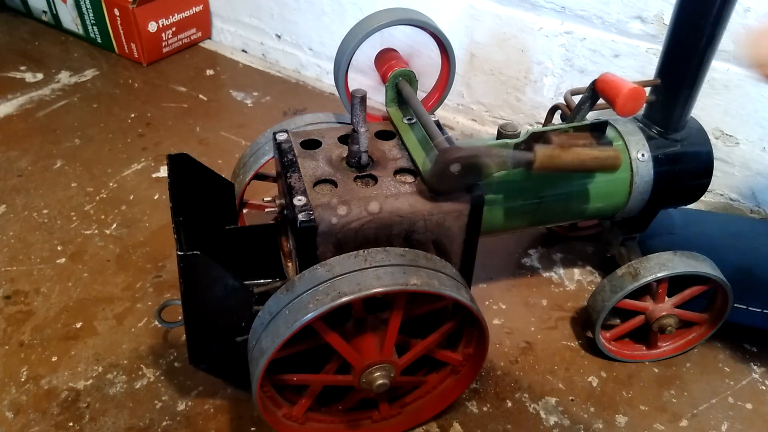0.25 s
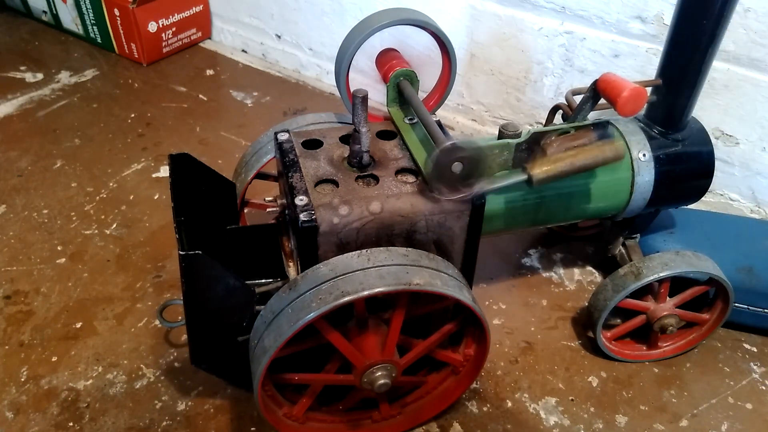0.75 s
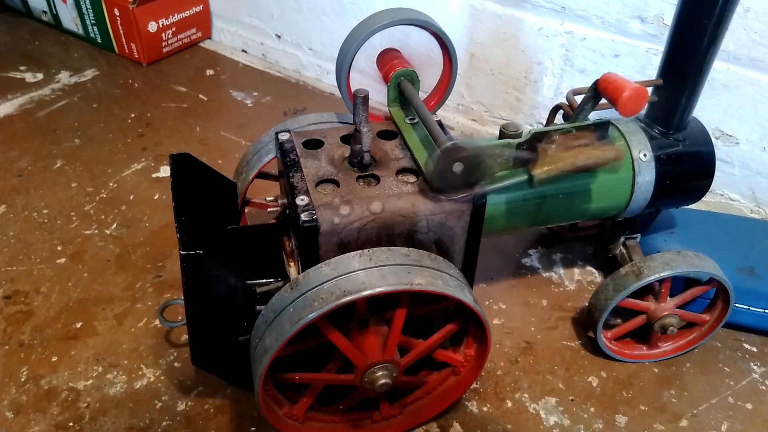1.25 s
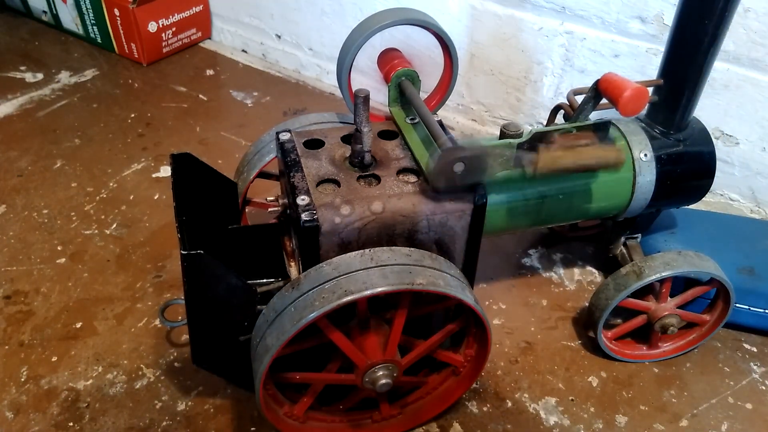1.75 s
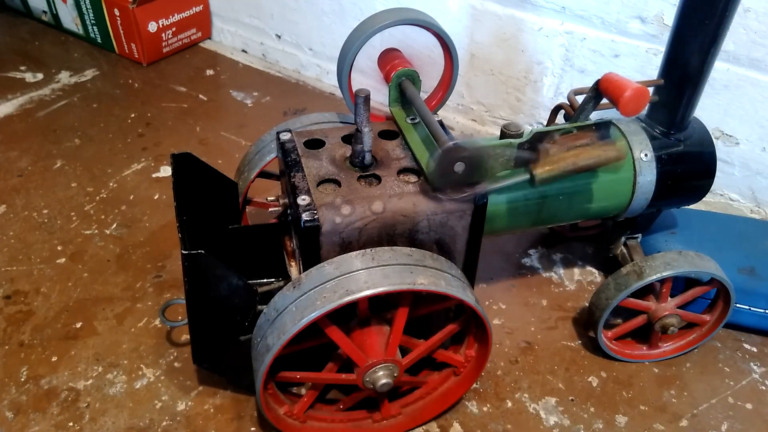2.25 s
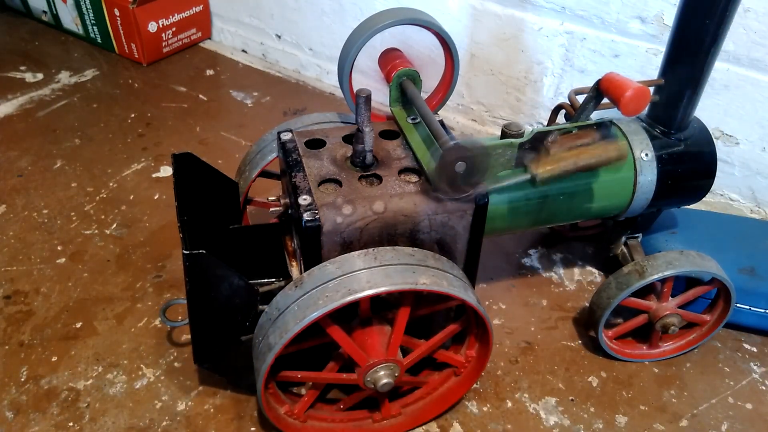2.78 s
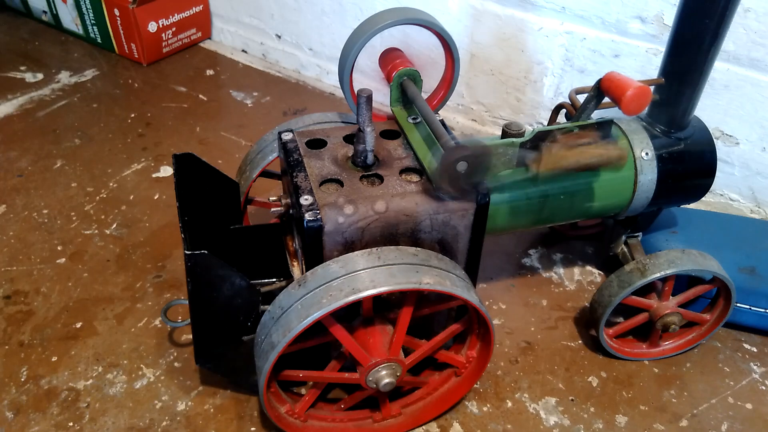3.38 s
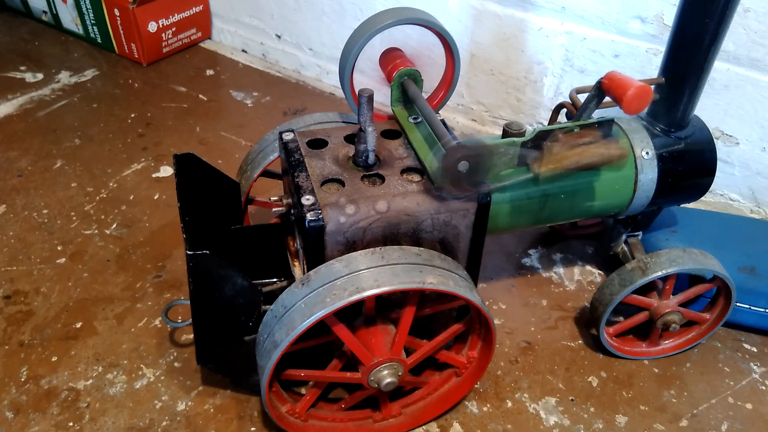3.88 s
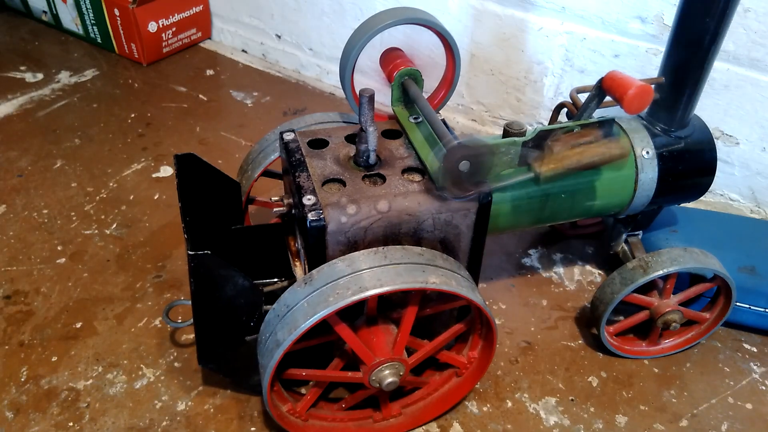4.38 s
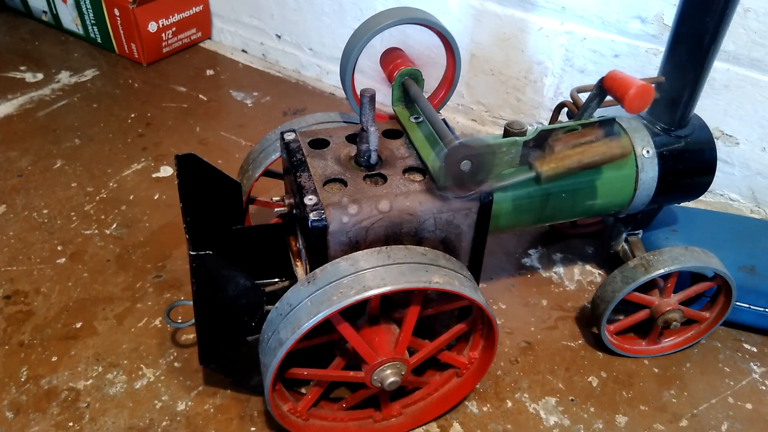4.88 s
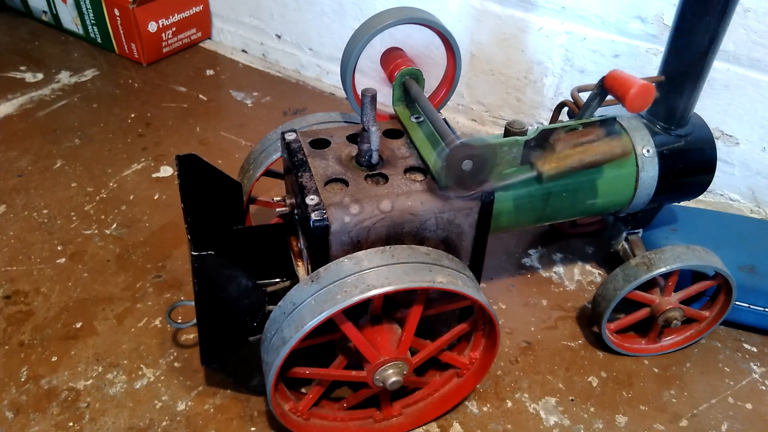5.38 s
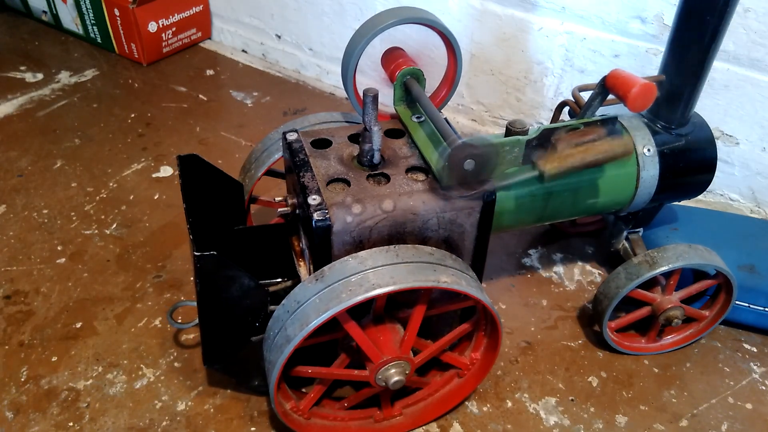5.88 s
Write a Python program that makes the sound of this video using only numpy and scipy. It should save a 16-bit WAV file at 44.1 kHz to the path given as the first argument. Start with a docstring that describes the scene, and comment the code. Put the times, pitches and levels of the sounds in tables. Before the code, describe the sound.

A toy steam engine starts with loose knocks, bursts into loud wet spitting chuffs, then settles into a quieter, dry, fast buzzing clatter.

```python
"""A toy steam traction engine on a workbench: its flywheel is flicked, and loose parts knock on slow turns.
Steam blows past the port faces, then water reaches the rocking cylinder and spits out at the exhaust strokes.
Each turn puffs, hisses and chirps at the inlet port, and knocks the crank so that tin body and bench ring.
The water runs out, and the engine hums dry and quieter at about 24 turns a second.
Puffs, hisses and spits are pulsed, coloured noise; knocks are blows on resonances; chirps and hum are sines."""
import sys
import numpy as np
from scipy import signal
from scipy.fft import rfft, irfft, next_fast_len
from scipy.io import wavfile
from scipy.ndimage import uniform_filter1d

SR = 44100
rng = np.random.default_rng(int(sys.argv[2]) if len(sys.argv) > 2 else 0)


def pcm_store(signal):
    """Save signal as 16-bit PCM."""
    levels = np.round(np.clip(np.atleast_2d(signal), -1, 1) * 32767)
    wavfile.write(sys.argv[1], SR, levels.astype(np.int16).T)


N = 270333
TIME = np.arange(N) / SR

# Resonances of the tin body. Each row: frequency in Hz, width in Hz, relative level in dB.
TIN_MODES = [(300, 60, -7), (414, 28, -2), (509, 70, 1), (644, 5.5, -1), (754, 32, 0), (879, 89, 4.5),
             (1010, 35, 0.5), (1476, 120, 1), (1760, 45, 6), (2202, 43, 1), (2900, 200, 0)]
# Tone of fine water spray. Each row: frequency in Hz, relative level in dB.
SPRAY_TONE = [(2000, -38), (8000, -45), (11000, 5.5), (13000, 12.5), (16000, 7)]
# Tone of sizzling drops, also of hissing steam. Each row: frequency in Hz, relative level in dB.
SIZZLE_TONE = [(200, -2), (700, 34.5), (1500, 28.5), (3000, 32), (5500, 39), (8000, 39), (11000, -9),
               (16000, -50)]

# the steam comes on: sounds that follow level() swell by START_DB
STEAM_ON_S, STEAM_RISE_S, START_DB = 0.34, 0.75, 14
# condensed water reaches the cylinder, then runs out
WET_AT_S, WET_RISE_S, DRY_AT_S, DRY_FALL_S = 0.74, 0.19, 2.693, 0.0603
# share of a turn at which the exhaust port opens
EXHAUST_SHARE = -.012


def from_db(db):
    """Decibels to gain."""
    return 10 ** (np.asarray(db) / 20)


def rms_one(x):
    """Scale to rms 1."""
    return x / np.sqrt(np.mean(x ** 2) + 1e-20)


def in_time(rows):
    """Columns of a curve, whose first column is seconds, at every sample."""
    s, *columns = np.transpose(rows)
    return [np.interp(TIME, s, column) for column in columns]


def colour(x, points):
    """Shape the spectrum of x by straight lines in dB over log frequency."""
    hz, db = np.transpose(points)
    size = next_fast_len(N + 4096)
    grid = np.maximum(np.fft.rfftfreq(size, 1 / SR), 1)
    gain = from_db(np.interp(np.log(grid), np.log(hz), db))
    return irfft(rfft(x, size) * gain, size)[..., :N]


def highpass(x, hz):
    """Remove the bass below hz."""
    return signal.sosfilt(signal.butter(2, hz, "high", fs=SR, output="sos"), x)


def steam(points, grain_db):
    """Steam noise of rms 1, partly alike at the two microphones; droplets in it make it grainy."""
    alike = 0.39  # share of the noise power common to both
    # each droplet lasts 8 samples
    droplets = np.repeat(np.clip(rng.standard_normal(N // 8 + 1), -2.5, 2.5), 8)[:N]
    common = np.sqrt(alike) * rng.standard_normal(N)
    separate = np.sqrt(1 - alike) * rng.standard_normal((2, N))
    return rms_one(colour((common + separate) * from_db(grain_db * droplets), points))


def flutter(rate_hz):
    """Slow random wavering of rms 1: noise averaged over 1 / rate_hz."""
    return rms_one(uniform_filter1d(rng.standard_normal(N), SR // rate_hz))


def resonate(x, hz, width_hz):
    """One resonance with gain 1 on top."""
    r = np.exp(-np.pi * width_hz / SR)
    zeros = np.array([1, 0, -1]) * (1 - r * r) / 2
    poles = [1, -2 * r * np.cos(2 * np.pi * hz / SR), r * r]
    return signal.lfilter(zeros, poles, x + 1e-18)


def body(x, modes):
    """Resonances in parallel, as of a struck or blown object."""
    return sum(from_db(db) * resonate(x, hz, width) for hz, width, db in modes)


def clicks(seconds, gains):
    """Single-sample blows."""
    out = np.zeros(N)
    out[np.clip(np.round(np.asarray(seconds) * SR).astype(int), 0, N - 1)] = gains
    return out


def each_turn(angle, share, uneven_db):
    """A blow of slightly uneven strength whenever the crank passes this share of a turn."""
    marks = np.arange(int(angle[-1]) + 1) + share
    gains = from_db(uneven_db * rng.standard_normal(len(marks))) * (marks < angle[-1])
    return clicks(np.interp(marks, angle, TIME), gains)


def bursts(blows, rise_s, decay_s):
    """Each blow opens a jet that swells quickly and dies away; height 1 for a blow of 1."""
    t = TIME[:SR // 8]
    shape = (1 - np.exp(-(t / rise_s) ** 2)) * np.exp(-t / decay_s)
    return signal.fftconvolve(blows, shape / shape.max())[:N]


def wetness():
    """Water in the cylinder, 0-1: it arrives, stays a while and is suddenly gone."""
    arriving = np.clip((TIME - WET_AT_S) / WET_RISE_S, 0, 1)
    return arriving * np.clip(1 - (TIME - DRY_AT_S) / DRY_FALL_S, 0, 1)


def level(dry_db, wet_db, drain_per_s):
    """Level in dB: swells as steam comes on, gains wet_db from water and loses a share of that per s."""
    starting = np.clip(1 - (TIME - STEAM_ON_S) / STEAM_RISE_S, 0, 1)
    draining = 1 - drain_per_s * (TIME - WET_AT_S - WET_RISE_S)
    return dry_db - START_DB * starting + wet_db * wetness() * draining


def slug_water():
    """Water passing through the cylinder in slugs, as a gain that sags slightly along each slug."""
    # Slugs that turn to spray over one or several strokes. Each row: start in seconds, length in
    # seconds (between a short rise and fall), level in dB.
    slugs = [(1.0, .19, -29), (1.22, .18, -15), (1.43, .06, -30), (1.52, .03, -27), (1.57, .02, -32),
             (1.667, .025, -29), (1.853, .02, -33), (1.897, .025, -24), (2.076, .16, -25),
             (2.217, .02, -29), (2.305, .02, -32), (2.61, .025, -35), (2.868, .025, -40), (3.04, .025, -40)]
    rise_s, fall_s, sag_db = .008, .02, -1
    water = 0
    for start, length, db in slugs:
        corners = np.cumsum([0, rise_s, length, fall_s])
        water = water + from_db(db) * np.interp(TIME - start, corners, [0, 1, from_db(sag_db), 0])
    return water


def spray(angle):
    """Each slug leaves as fine spray, mostly at the exhaust stroke, a little at the inlet port."""
    inlet_db, steady_db = -18, -31  # at the inlet and between strokes, against the exhaust
    at_exhaust = bursts(each_turn(angle, EXHAUST_SHARE, uneven_db=.5), rise_s=0.0003, decay_s=0.0038)
    at_inlet = bursts(each_turn(angle, .57, uneven_db=1), rise_s=0.002, decay_s=0.005)
    return slug_water() * (at_exhaust + from_db(inlet_db) * at_inlet + from_db(steady_db))


def exhaust(angle):
    """Every stroke puffs steam and rings the pipe; water thrown out with it spits as broken jets."""
    # Blowing of the pipe. Each row: time in seconds, level in dB, centre of the favoured resonances in Hz.
    pipe_blow = [(0.2, -83, 457), (1.0, -54, 516), (1.45, -47, 616), (2.3, -52, 678), (2.5, -47.5, 800),
                 (2.7, -56, 940), (3.2, -70.5, 708), (6.13, -68, 645.7)]
    # Pipe and chimney resonances. Each row: frequency in Hz, width in Hz, relative level in dB.
    pipe_modes = [(520.6, 24.5, 8), (655, 16, -1), (733, 19, 8.5), (898, 19, 12.5), (1118, 30, 2.5)]
    # Water thrown out by the strokes. Each row: time in seconds, jet level in dB before slugs add to it.
    spitting = [(0.76, -60), (0.85, -39), (0.9, -38), (0.97, -28), (1.3, -29.5), (1.48, -26), (1.67, -28),
                (1.77, -34), (2.4, -34), (2.68, -32), (2.76, -52), (3.8, -66)]
    # Tones of the water jets and of the puffs. Each row: frequency in Hz, relative level in dB.
    spit_tone = [(200, -79), (500, 0.5), (1500, -7.5), (2800, -2), (4300, 8), (6000, 5), (8000, 10),
                 (10000, 10.5), (11500, 12.5), (12700, -1), (16000, -32)]
    puff_tone = [(300, -31), (700, -9), (1500, -3), (2600, -23), (4300, 5), (6000, 7), (7700, 33.5),
                 (10000, 27), (13000, 31), (16000, 23.5)]

    strokes = each_turn(angle, 0, uneven_db=1)
    puff_gain = from_db(level(dry_db=-48.5, wet_db=1.3, drain_per_s=0.092))
    puffs = puff_gain * bursts(strokes, rise_s=.0025, decay_s=.005) * steam(puff_tone, grain_db=2)

    jet_db, = in_time(spitting)
    # a slug also strengthens the jet that carries it
    force = from_db(jet_db) + from_db(-10.5) * slug_water()
    openings = each_turn(angle, EXHAUST_SHARE, uneven_db=.5)
    jets = bursts(force * openings, rise_s=0.0004, decay_s=0.006) * steam(spit_tone, grain_db=0.5)
    # fine spray adds a very bright edge
    bright_edge = spray(angle) * steam(SPRAY_TONE, grain_db=-6.0)
    # water breaks each jet up
    sputter = from_db(2.2 * flutter(900))
    spits = sputter * (jets + bright_edge)

    pipe_db, centre_hz = in_time(pipe_blow)
    # the pressure step of each stroke rings the pipe; turbulence joins in when it blows hard
    pressure = rms_one(each_turn(angle, .08, uneven_db=.4))
    turbulence = rms_one(bursts(strokes, rise_s=0.0043, decay_s=0.029) * rng.standard_normal(N))
    flow = pressure + from_db(.8 * (pipe_db + 47)) * turbulence
    # the favoured pitch climbs as the pipe clears of water, then settles lower
    ring = 0
    for hz, width, db in pipe_modes:
        off_centre_octaves = np.abs(np.log2(hz / centre_hz))
        ring = ring + from_db(db - 20 * off_centre_octaves) * resonate(flow, hz, width)
    return puffs + spits + from_db(pipe_db) * rms_one(ring)


def chuffs(angle):
    """The body of each exhaust beat: a low thud and a ragged rush of steam that rings the tin."""
    # Each row: time in seconds, rush of steam in dB, thud in dB.
    chuffing = [(0.1, -82, -86), (0.45, -63, -60), (0.7, -56.5, -64), (0.85, -40, -44.5), (1.0, -36, -49.5),
                (1.7, -43, -55), (1.85, -42, -57), (2.39, -50.5, -55), (2.44, -41, -51), (2.51, -50, -45),
                (2.55, -46, -57.5), (2.69, -55, -54), (2.78, -58, -63), (3.3, -59, -65), (6.13, -69, -71.5)]
    # Tone of the rush. Each row: frequency in Hz, relative level in dB.
    rush_tone = [(120, -9), (310, -12), (500, 1.5), (900, 0), (1350, 0.5), (2300, -3.5), (6000, -5),
                 (12000, -53)]
    rush_db, thud_db = in_time(chuffing)
    beats = each_turn(angle, .06, uneven_db=.6)
    thud = rms_one(resonate(resonate(beats, 185, 125), 185, 125))
    swell = bursts(each_turn(angle, 0, uneven_db=1), rise_s=.005, decay_s=.007)
    ragged = from_db(2.5 * flutter(400))
    noise = steam(rush_tone, grain_db=2.0)
    rush = rms_one(noise + 0.39 * rms_one(body(noise, TIN_MODES)))
    return from_db(thud_db) * thud + from_db(rush_db) * swell * ragged * rush


def inlet(angle):
    """Half a turn later the inlet port slides open with a hiss, then chirps like a small whistle."""
    # Resonances of the port. Each row: frequency in Hz, width in Hz, relative level in dB.
    port_modes = [(3850, 130, 9), (4140, 140, -13), (5300, 560, -15)]
    # Tone of the hiss. Each row: frequency in Hz, relative level in dB.
    hiss_tone = [(500, -50), (1700, -33), (3000, -8), (5000, 0), (7500, 0), (8400, 1), (9400, 15),
                 (11000, 6.5), (12900, 12.5), (14500, 0), (16000, -30)]
    # Pitch of the whistling port: Hz when dry, Hz when wet.
    chirp_hz = (3830, 3990)

    opened = (angle - .54) % 1  # turns since the port opened
    opening = (1 - np.exp(-(opened / 0.0049) ** 2)) * np.exp(-opened / 0.14)
    hiss_gain = from_db(level(dry_db=-44, wet_db=7.9, drain_per_s=.02))
    hiss = hiss_gain * opening * steam(hiss_tone, grain_db=1.5)

    # the port chirps again, more weakly, at the exhaust stroke
    blows = each_turn(angle, .572, uneven_db=.6) + from_db(-6) * each_turn(angle, .025, uneven_db=1)
    chirps = bursts(blows, rise_s=0.0022, decay_s=.0016)
    # turbulence shakes the pitch of the whistle
    pitch_hz = np.interp(wetness(), [0, 1], chirp_hz) * (1 + .06 * flutter(600))
    whistle = rms_one(chirps * np.sin(2 * np.pi * np.cumsum(pitch_hz) / SR))
    rush = rms_one(body(chirps * rng.standard_normal(N), port_modes))
    whistle_gain = from_db(level(dry_db=-70.5, wet_db=18, drain_per_s=.03))
    rush_gain = from_db(level(dry_db=-67, wet_db=12.5, drain_per_s=.03))
    # the port only sings once water has wetted it
    wetted = np.interp(TIME, [WET_AT_S, 1.2], [0, 1])
    return hiss + wetted * (whistle_gain * whistle + rush_gain * rush)


def crank(angle, thump_db, clatter_db):
    """Slack in the crank knocks at the reversals: a push into the bench and a click into the tin."""
    # Contacts in each turn. Each row: share of a turn, relative push in dB, contact in seconds,
    # relative click in dB.
    knocks = [(0.034, 7.5, 0.0043, 9.5), (0.146, 9, 0.0078, 14), (0.341, 1.5, 0.0037, 7),
              (0.62, -3, 0.0038, 13), (0.862, -56, 0.0028, 13)]
    # Bench and chassis resonances. Each row: frequency in Hz, width in Hz, relative level in dB.
    bench_modes = [(89.5, 4.3, -8), (127.4, 17, 8), (159.4, 47, -3), (212, 14, 5), (221.5, 18, -7),
                   (333, 5.7, 11)]
    pushes, ticks = 0, 0
    for share, push_db, contact_s, click_db in knocks:
        blows = each_turn(angle, share, uneven_db=.5)
        push = np.exp(-(2 * (TIME[:SR // 25] - TIME[SR // 50]) / contact_s) ** 2)
        pushes = pushes - from_db(push_db) * signal.fftconvolve(blows, push / push.sum(), "same")
        ticks = ticks + from_db(click_db) * blows
    bench_noise = rms_one(body(rng.standard_normal(N), bench_modes))
    bench = rms_one(body(pushes, bench_modes)) + from_db(-21.5) * bench_noise
    # the bench radiates little deep bass
    thump = rms_one(highpass(bench, 80))
    # loose parts rattle differently on every turn
    fading = np.exp(-TIME[:SR // 25] / 0.0023)
    scrape = signal.fftconvolve(ticks, fading)[:N] * rng.standard_normal(N)
    clatter = rms_one(body(ticks, TIN_MODES)) + from_db(-4.5) * rms_one(body(scrape, TIN_MODES))
    return from_db(thump_db) * thump, from_db(clatter_db) * clatter


def taps(angle):
    """Piston, port and crank each tap once a turn: a few cycles that rise in pitch, firmer against water."""
    # Short hollow taps. Each row: share of a turn, pitch in Hz at the middle, length in seconds,
    # dry level in dB and extra when wet in dB, both before a common trim.
    tap_rows = [(0.62, 950, .0020, -60, 14), (0.86, 830, .0016, -67, 16), (0.97, 430, .0022, -58, 7),
                (0.02, 930, .0018, -70, 27), (0.075, 1560, .0012, -59, 6), (0.14, 690, .0026, -58, 12),
                (0.16, 1450, .0012, -63, 8), (0.3, 450, .0022, -64, 10)]
    glide_per_s, trim_db = 45, -1  # share of the pitch gained per second
    t = TIME[:SR // 50] - TIME[SR // 100]
    out = 0
    for share, hz, length_s, dry_db, wet_db in tap_rows:
        tap = np.exp(-(t / length_s) ** 2) * np.sin(2 * np.pi * hz * t * (1 + glide_per_s * t / 2))
        struck = signal.fftconvolve(each_turn(angle, share, uneven_db=1), tap, "same")
        out = out + from_db(level(dry_db + trim_db, wet_db, drain_per_s=0)) * struck
    return out


def first_knocks():
    """The slack rod rattles briefly as the flywheel is let go and takes its slow first turns."""
    # Each row: time in seconds, level in dB.
    knock_rows = [(0.002, -54), (0.1, -59), (0.2, -69), (0.29, -63), (0.374, -61), (0.452, -58),
                  (0.525, -59), (0.594, -59), (0.656, -57), (0.721, -58)]
    # Crank and piston rod resonances. Each row: frequency in Hz, width in Hz, relative level in dB.
    rod_modes = [(390, 25, 1.5), (760, 28, -4), (910, 61, -4), (1110, 110, 2), (1550, 260, -7)]
    s, db = np.transpose(knock_rows)
    rattle = rms_one(body(rng.standard_normal(N), rod_modes))
    return bursts(clicks(s, from_db(db)), rise_s=.002, decay_s=.013) * rattle


def blow_by(angle):
    """Steam whistles softly past the port faces on the first turns, until water seals them."""
    # Resonances of the gap between the faces. Each row: frequency in Hz, width in Hz, relative level in dB.
    gap_modes = [(2060, 200, 1.5), (5060, 51, 6)]
    first_turns = (TIME > .39) * (TIME < .74)
    # the inlet is under pressure at this share of a turn
    blows = each_turn(angle, .625, uneven_db=1) * first_turns
    whistling = rms_one(body(rng.standard_normal(N), gap_modes))
    hiss = steam(SIZZLE_TONE, grain_db=0) + from_db(-5) * whistling
    gain = from_db(level(dry_db=-45, wet_db=0, drain_per_s=0))
    return gain * bursts(blows, rise_s=0.0037, decay_s=0.018) * hiss


def first_spit():
    """One sharp, bright spit of noise as the water reaches the cylinder."""
    spit = bursts(clicks(.763, from_db(-34)), rise_s=.0005, decay_s=.01)
    return spit * (steam(SPRAY_TONE, grain_db=2) + steam(SIZZLE_TONE, grain_db=2)) / 2


def gurgles(angle):
    """Water left in the pipes makes the steam sing in limited bands, in time with the strokes."""
    # Each row: start in seconds, end in seconds, frequency in Hz, width in Hz, level in dB before the swell.
    bands = [(0.272, 1.345, 162, 137, -46.5), (0.3, 1.102, 384, 130, -57.5),
             (0.698, 2.599, 229.5, 59, -52.5), (1.946, 2.795, 10360, 3580, -41.5),
             (2.56, 3.635, 393, 99, -60.5), (2.55, 3.241, 5260, 1920, -51.5),
             (3.425, 3.897, 1570, 507, -60.5)]
    strokes = each_turn(angle, EXHAUST_SHARE, uneven_db=0.5)
    surge = 0.26 + bursts(strokes, rise_s=0.0043, decay_s=0.0067)
    out = 0
    for start, end, hz, width, db in bands:
        band = resonate(resonate(surge * rng.standard_normal(N), hz, width), hz, width)
        swell = np.interp(TIME, [start, (start + end) / 2, end], [0, 1, 0])
        out = out + from_db(db) * swell * rms_one(band)
    return out


def leaks():
    """Wet steam escapes between the port faces, and stray drops sizzle on the hot boiler."""
    # Sizzling drops. Each row: start in seconds, length in seconds, level in dB.
    sizzles = [(0.078, 0.04, -56), (3.488, 0.18, -51.5), (4.588, 0.079, -54), (4.87, 0.13, -57),
               (5.538, 0.07, -56), (5.651, 0.028, -52.5), (6.007, .03, -56)]
    # Tone of the leak. Each row: frequency in Hz, relative level in dB.
    leak_tone = [(200, 0), (700, 4.5), (1300, 1), (2200, 8.5), (2800, -2), (4000, 12), (4800, 6.5),
                 (6300, 6.5), (7600, 9.5), (8400, -1), (9400, 1), (11500, 4), (13000, -33), (16000, -18)]
    drops = 0
    for start, length, db in sizzles:
        corners = [start, start + length / 10, start + length / 2, start + length]
        drops = drops + from_db(db) * np.interp(TIME, corners, [0.0095, 1, 0.63, 0.0024])
    leak_gain = from_db(level(dry_db=-60.5, wet_db=14, drain_per_s=.03))
    return leak_gain * steam(leak_tone, grain_db=8.0) + drops * steam(SIZZLE_TONE, grain_db=4)


def hum(angle):
    """Running free, the engine settles into clear multiples of its turning rate."""
    # Each row: multiple of the turning rate, level in dB (rms).
    partials = [(5, -61.5), (8, -74.5), (9, -68.5), (13, -76), (14, -77.5), (20, -73.5), (27, -70),
                (37, -101)]
    tones = 0
    for multiple, db in partials:
        phase = 2 * np.pi * round(multiple) * (angle - .1)
        tones = tones + from_db(db) * np.sqrt(2) * np.cos(phase)
    return np.interp(TIME, [2.6, 3.6], [0, 1]) * tones


def rumble(thump_db):
    """The labouring engine shudders on the bench: deep noise that follows the load steeply."""
    band = signal.butter(2, [18, 80], "band", fs=SR, output="sos")
    deep = rms_one(signal.sosfilt(band, rng.standard_normal(N)))
    # -62 dB where the thump is at -42.5 dB, 1.85 dB per dB of load around that
    return from_db(-62 + 1.85 * (thump_db + 42.5)) * deep


def workshop(x, t60, wet_db, low_hz):
    """Strong early reflections from bench and wall and a fainter tail, different at each microphone."""
    t = TIME[:SR // 3]
    fading = from_db(-60 * t / t60) + 8 * np.exp(-t / 0.00086)
    echoes = highpass(rng.standard_normal((2, len(t))) * (t > .0005) * fading, low_hz)
    echoes /= np.sqrt(np.sum(echoes ** 2, axis=1, keepdims=True))
    return from_db(wet_db) * signal.fftconvolve(x, echoes, axes=1)[:, :N]


def background():
    """Steady coloured noise, independent at the two microphones."""
    # Each row: frequency in Hz, relative level in dB.
    floor_tone = [(25, -11), (120, 2), (300, -2), (700, -17), (1100, -9), (2400, -22.5), (4000, -31),
                  (6500, -11), (12000, -1.5), (16000, -4.5)]
    return from_db(-56.5) * rms_one(colour(rng.standard_normal((2, N)), floor_tone))


def heard(x, lag_s):
    """A source at the two microphones, the left one a little later."""
    return np.array([np.interp(TIME - lag_s, TIME, x[0]), x[1]])


def scene():
    """The engine close by, its sound reaching the right microphone first."""
    # Flywheel. Each row: time in seconds, turns per second.
    flywheel = [(0.0, 10.63), (0.3, 11.711), (0.6, 15.044), (0.9, 17.05), (1.2, 19.152), (1.5, 20.497),
                (1.8, 21.47), (2.2, 22.329), (2.6, 23.006), (3.0, 23.527), (3.6, 23.753), (4.5, 23.92),
                (6.13, 23.925)]
    # Load on the crank, high while the piston pushes against water. Each row: time in seconds,
    # bench thump in dB before the bass cut.
    load = [(0.05, -87), (0.2, -63.5), (0.5, -51), (0.75, -45), (1.4, -41), (1.85, -42), (1.98, -50.5),
            (2.5, -50.5), (3.0, -54.5), (6.13, -55)]
    # The bench cannot radiate deep bass. Each row: frequency in Hz, gain in dB.
    bass_cut = [(35, -36), (50, -20), (68, 0)]
    # The right microphone faces away. Each row: frequency in Hz, gain in dB.
    facing_away = [(60, 0.5), (200, -3), (400, 0.5), (1300, -4), (2400, 2.5), (4400, -2.5), (8000, -4.5),
                   (10500, -7), (12500, -14.5), (16000, -25)]

    speed, = in_time(flywheel)
    angle = np.cumsum(speed) / SR - .27  # in turns
    thump_db, = in_time(load)
    # the tin clatters harder under load than when running free, at thumps of -56 dB or less
    clatter_db = level(dry_db=-64.5, wet_db=13.9, drain_per_s=0.43) + 0.27 * np.maximum(thump_db + 56, 0)
    thump, clatter = crank(angle, thump_db, clatter_db)
    bench = colour(thump, bass_cut) + rumble(thump_db) + hum(angle)
    engine = exhaust(angle) + chuffs(angle) + clatter + taps(angle) + first_knocks()
    engine = engine + blow_by(angle) + first_spit() + gurgles(angle) + leaks()
    port = inlet(angle)
    # the inlet port is nearer the middle of the two microphones
    direct = heard(engine + bench, lag_s=0.00013) + heard(port, lag_s=0.00006)
    reflections = workshop(engine + port, t60=.25, wet_db=-3, low_hz=1000)
    left, right = direct + reflections + background()
    return np.array([left, colour(right, facing_away)])


def record(dry):
    """The top is cut steeply above 16 kHz."""
    return signal.sosfilt(signal.ellip(10, .2, 70, 16000, fs=SR, output="sos"), dry)


dry = scene()
out = record(dry)
pcm_store(out)
```